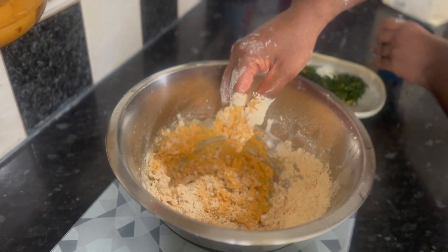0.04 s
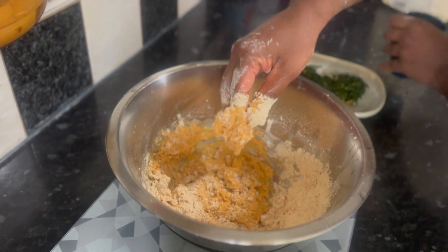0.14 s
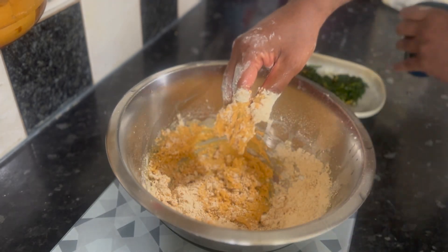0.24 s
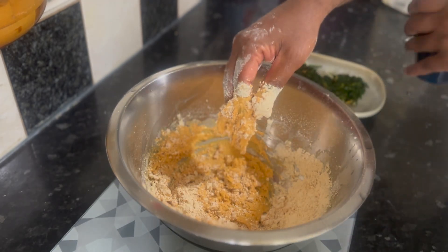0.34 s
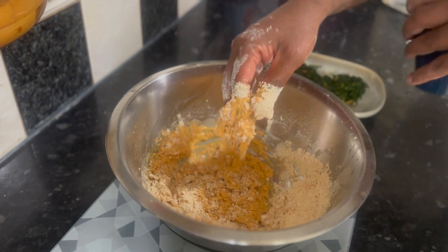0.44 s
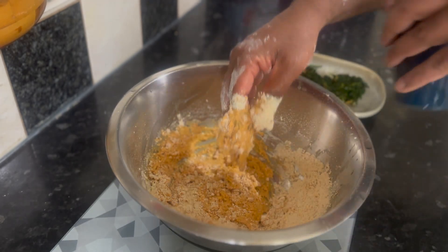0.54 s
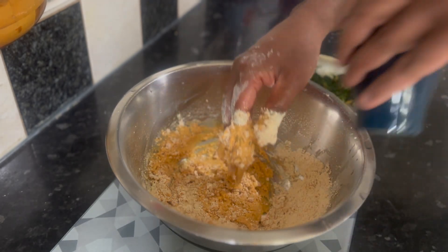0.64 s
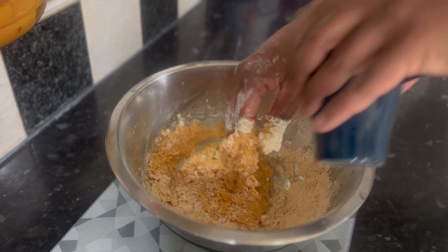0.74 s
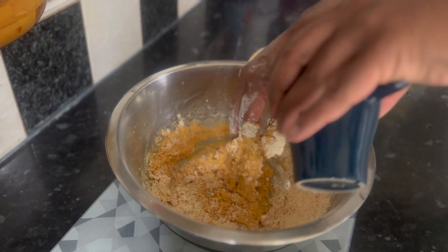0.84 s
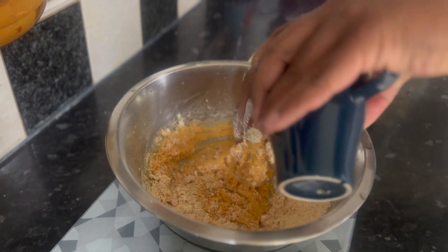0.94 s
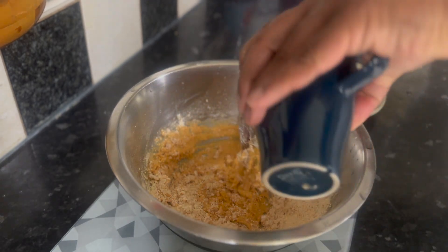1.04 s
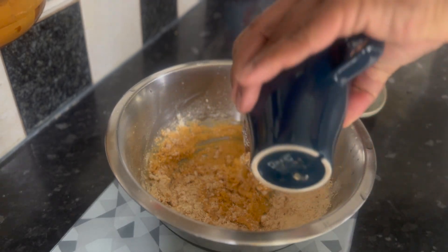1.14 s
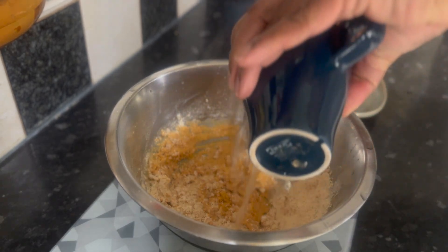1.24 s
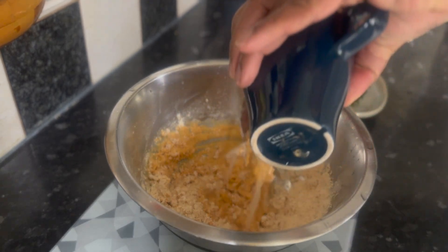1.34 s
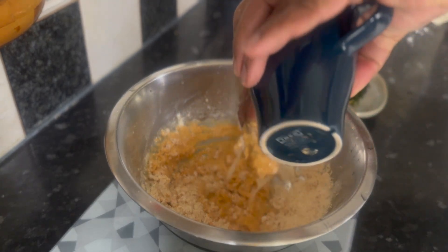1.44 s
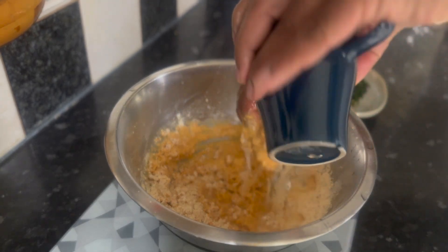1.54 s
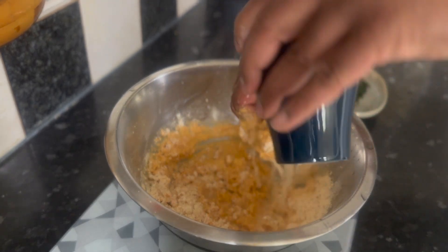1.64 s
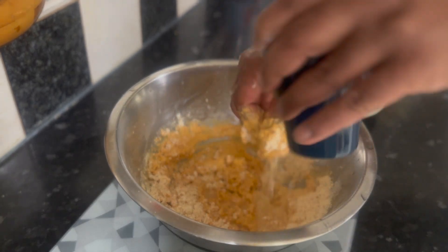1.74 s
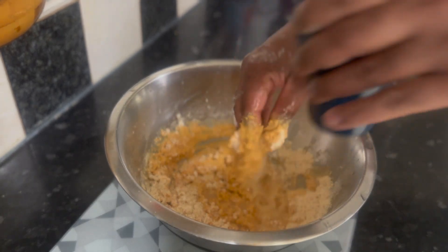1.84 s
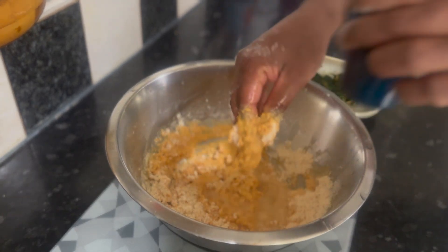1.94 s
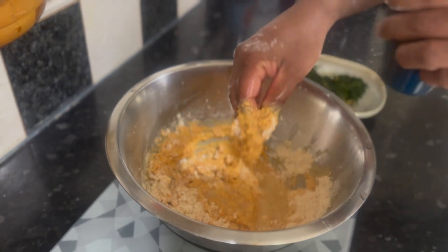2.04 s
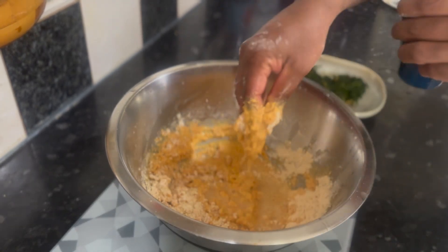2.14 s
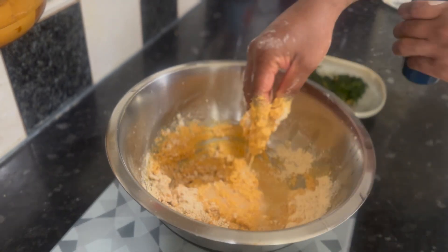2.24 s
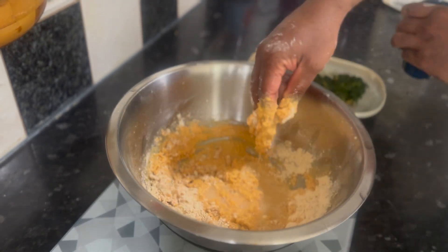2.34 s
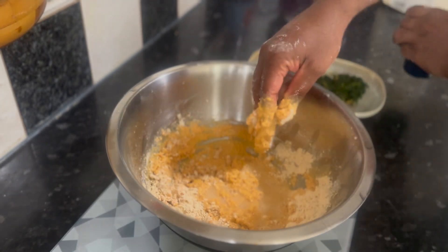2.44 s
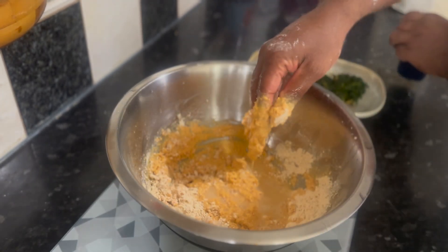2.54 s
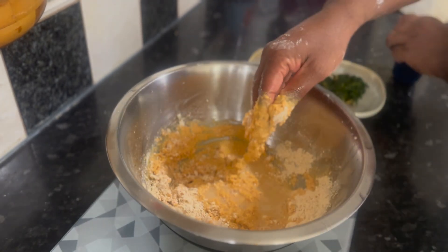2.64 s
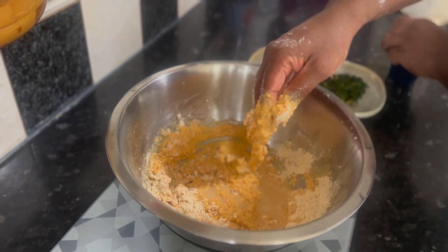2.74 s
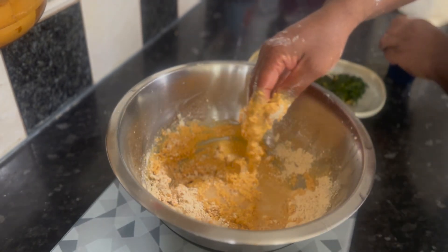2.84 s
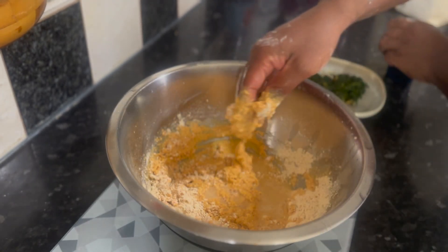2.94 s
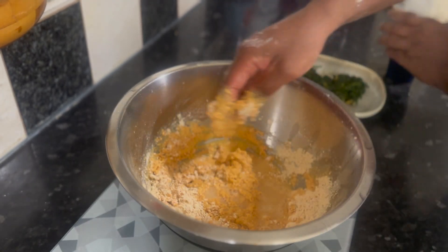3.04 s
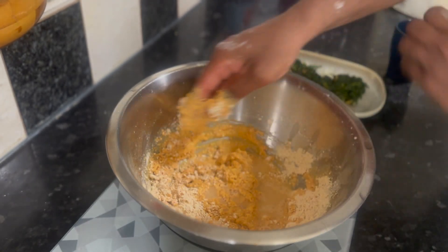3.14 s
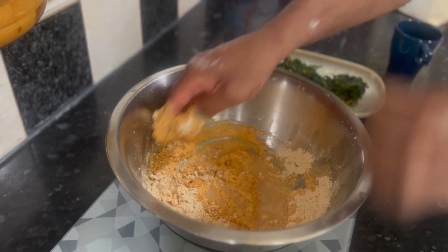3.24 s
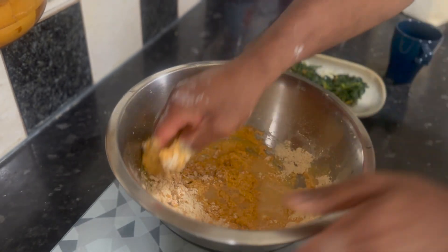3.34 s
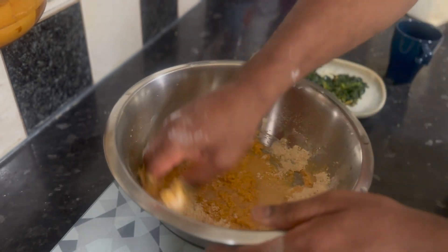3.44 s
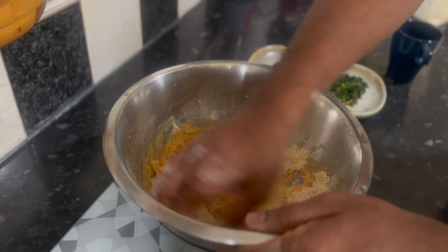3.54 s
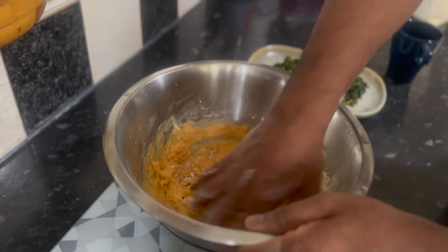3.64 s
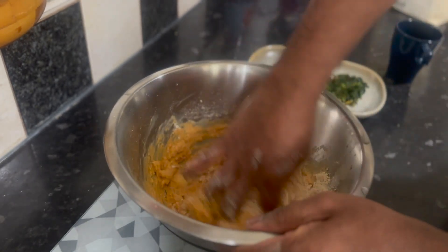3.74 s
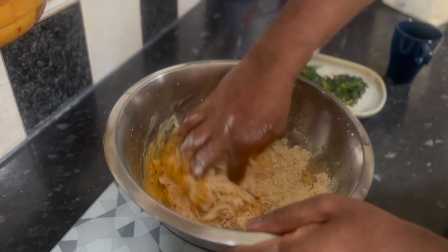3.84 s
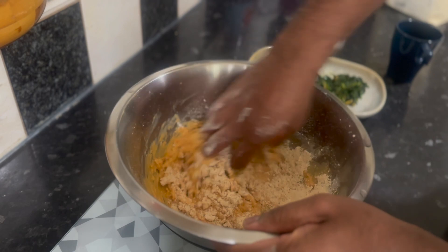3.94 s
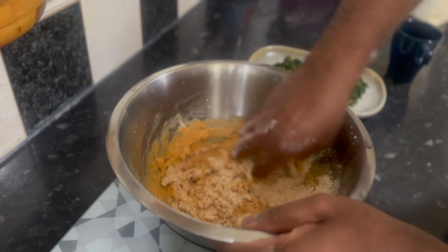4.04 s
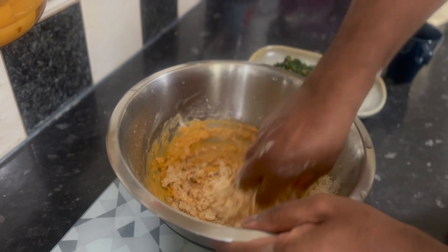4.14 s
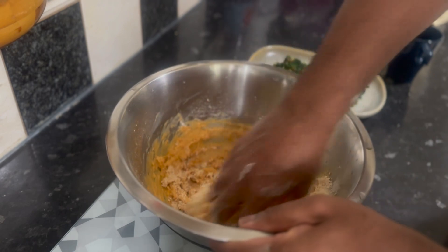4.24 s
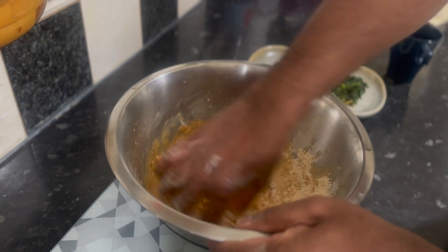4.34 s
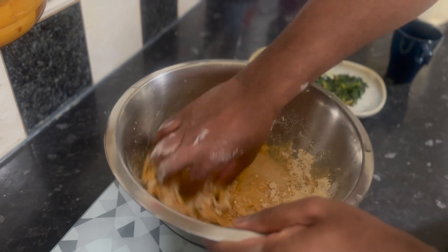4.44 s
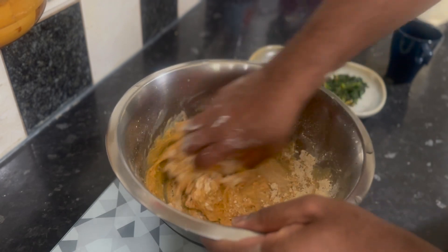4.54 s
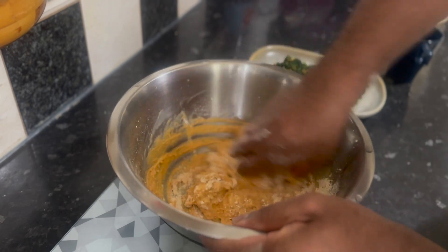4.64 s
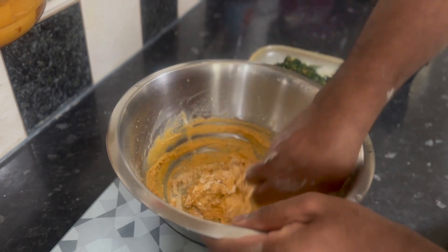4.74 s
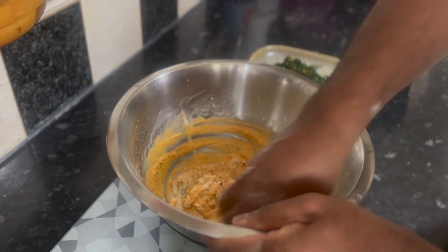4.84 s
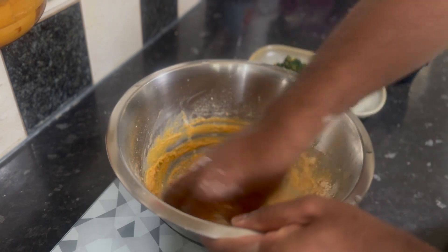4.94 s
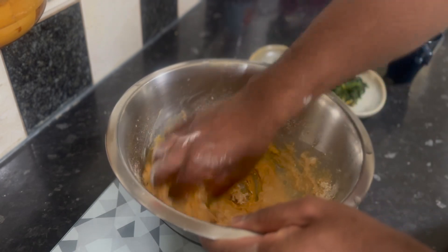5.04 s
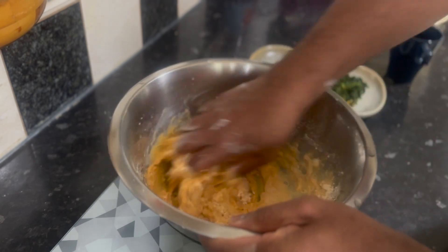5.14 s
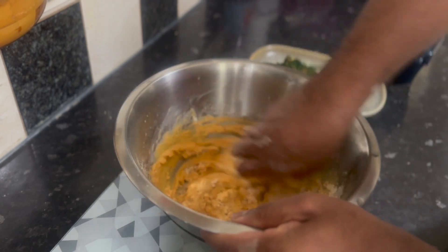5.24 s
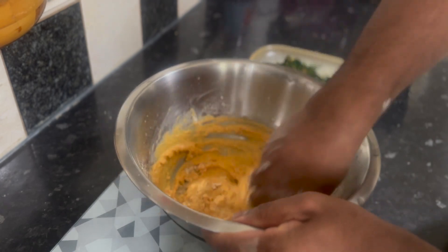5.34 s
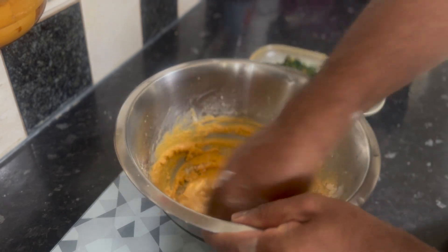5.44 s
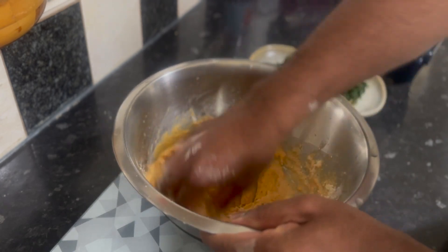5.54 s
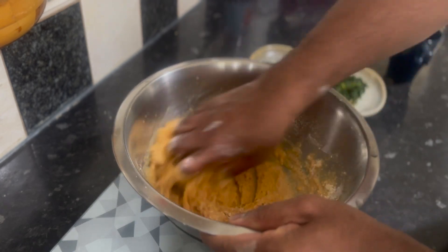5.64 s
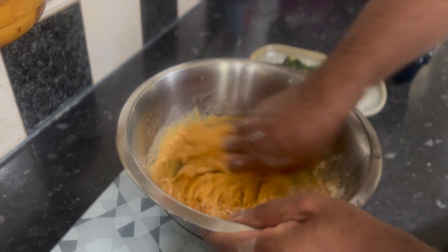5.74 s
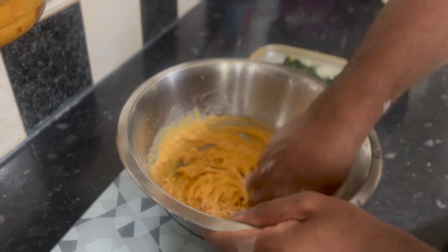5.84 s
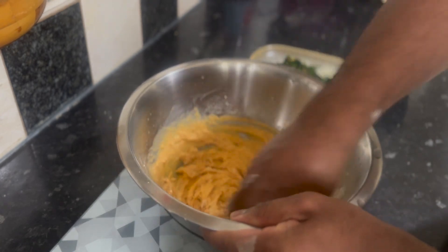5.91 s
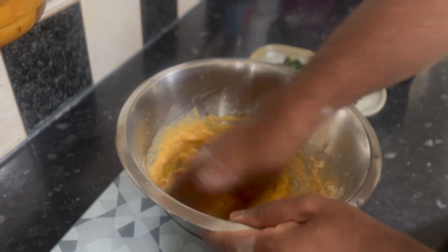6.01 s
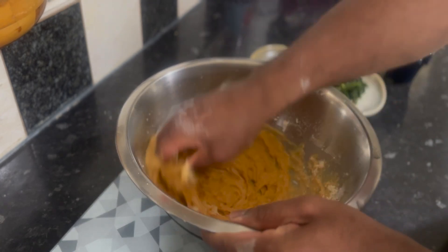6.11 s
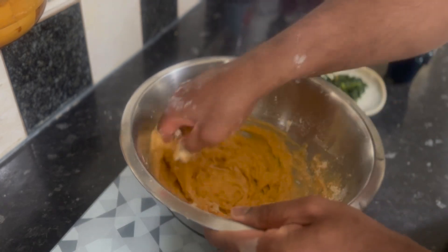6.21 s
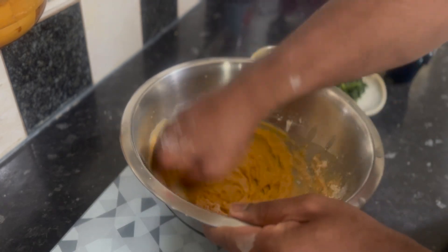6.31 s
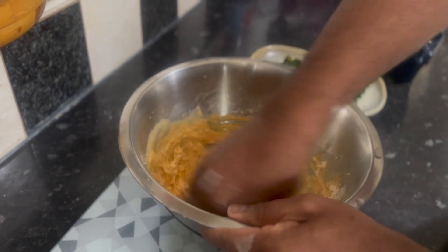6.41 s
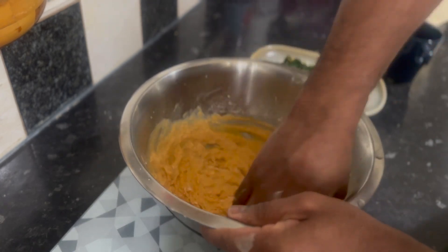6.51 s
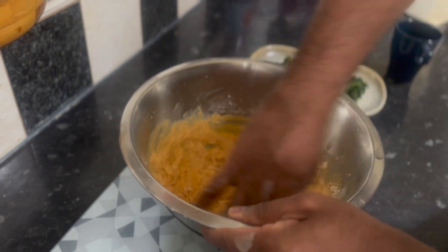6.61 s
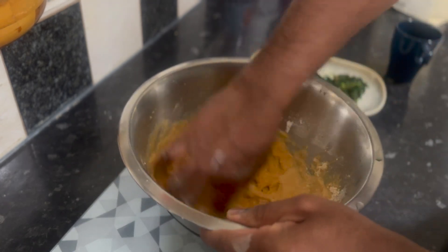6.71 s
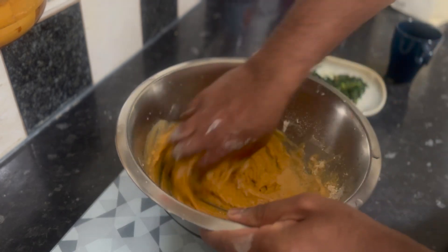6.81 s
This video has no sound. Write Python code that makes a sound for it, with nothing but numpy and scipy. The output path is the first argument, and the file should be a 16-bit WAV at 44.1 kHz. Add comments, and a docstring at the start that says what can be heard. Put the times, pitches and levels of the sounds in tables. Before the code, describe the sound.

A short pour and one loud mug knock on stone, followed by soft, wet squishing and popping of batter mixed by hand.

```python
"""A hand kneads wet batter in a steel bowl: it drags, squelches and fizzes, air pockets plop, wet films snap.
Before the main kneading, a mug clinks lightly and its water patters, bubbles and splashes onto flour; it
is set down hard and rocks, ringing the stone counter. Dull bumps come through the counter. Behind it
all: the kitchen's low rumble, a faint hiss and a thin tick about thirty times a second."""
import sys
import numpy as np
from scipy import signal
from scipy.fft import rfft, irfft, next_fast_len
from scipy.io import wavfile
from scipy.ndimage import uniform_filter1d, map_coordinates

SR = 44100
rng = np.random.default_rng(int(sys.argv[2]) if len(sys.argv) > 2 else 0)


def unload_wav(signal):
    """Save mono or channel-first audio to the path in sys.argv[1] as 16-bit WAV at rate SR, clipped to [-1, 1]."""
    wavfile.write(
        sys.argv[1],
        SR,
        np.round(np.clip(np.atleast_2d(signal).T, -1, 1) * 32767).astype(np.int16),
    )


N = 302973

# dull spectrum of dough drag and water patter: freq_hz, gain_db
DULL_SPECTRUM = [(80, -44.5), (140, -5.5), (220, -3), (330, 3), (480, 0.5), (600, -0.5), (720, -16.5),
                 (1200, -26.5)]
# wet spectrum of squelch and stream: freq_hz, gain_db
WET_SPECTRUM = [(400, -10.5), (750, -5), (1050, -1.5), (1500, -4), (2200, -5), (2800, -6.5), (3300, -10),
                (4500, -12.5), (8000, -25)]


def amp(db):
    """dB to gain."""
    return 10 ** (np.asarray(db) / 20)


def unit(x):
    """Scale to rms 1."""
    return x / np.sqrt(np.mean(x ** 2) + 1e-20)


def along(points, hz):
    """Interpolate (freq_hz, value) points on a log axis."""
    freq_hz, values = np.transpose(points)
    return np.interp(np.log(hz + 1), np.log(freq_hz + 1), values)


def gains(rows):
    """Smoothed gain curve per dB column; silent outside the table."""
    time_s, *columns_db = np.transpose(rows)
    curves = amp([np.interp(np.arange(N) / SR, time_s, db, left=-200, right=-200) for db in columns_db])
    return uniform_filter1d(curves, size=900, axis=1, mode="nearest")


def swell(rows, sag_db=2, release_t60_s=0.39):
    """Gain curve per dB column: each gesture rises, sags and dies away; powers add."""
    t, power = np.arange(N) / SR, 0
    for start_s, rise_s, length_s, *levels_db in rows:
        age_s = t - start_s
        attack = np.sin(np.pi / 2 * np.clip(age_s / max(rise_s, .002), 0, 1)) ** 2
        sag = amp(-sag_db * np.clip(age_s / length_s, 0, 1))
        release = amp(-60 * np.clip(age_s - length_s, 0, 1) / release_t60_s)
        power = power + (amp(levels_db)[:, None] * attack * sag * release) ** 2
    return np.sqrt(power)


def wobble(knots_per_s):
    """Smooth random curve."""
    knots = rng.standard_normal(int(N * knots_per_s / SR) + 4)
    return map_coordinates(knots, [np.arange(N) * knots_per_s / SR])


def filtered(x, response):
    """Apply response(hz) by FFT."""
    n = x.shape[-1]
    n_fft = next_fast_len(n + 4096)
    return irfft(rfft(x, n_fft) * response(np.fft.rfftfreq(n_fft, 1 / SR)), n_fft)[..., :n]


def coloured(x, spectrum):
    """Shape by (freq_hz, gain_db) points; rms 1."""
    return unit(filtered(x, lambda hz: amp(along(spectrum, hz))))


def add(track, start_s, sound):
    """Mix in at start_s."""
    part = track[:, round(start_s * SR):][:, :sound.shape[1]]
    part += sound[:, :part.shape[1]]


def rush(spectrum, patchy_db=0, grains_per_s=0, spread_db=0, crackle_share=0, size=N):
    """Noise pair, rms 1: random time-frequency patches plus crackle grains of scattered size."""
    bins = signal.stft(rng.standard_normal((2, size)), nperseg=256)[2]
    patches = uniform_filter1d(rng.standard_normal(bins.shape[1:]), size=8, axis=0)
    patches = uniform_filter1d(patches, size=6, axis=1)
    noise = signal.istft(bins * amp(patchy_db * unit(patches)), nperseg=256)[1][:, :size]
    onsets = rng.random(size) < grains_per_s / SR
    strength = amp(spread_db * np.minimum(rng.exponential(size=size), 3.5))
    grains = signal.lfilter([1], [1, -np.exp(-1 / (0.0029 * SR))], onsets * strength)
    crackle = grains * rng.standard_normal((2, size))
    mix = np.sqrt(1 - crackle_share) * unit(noise) + np.sqrt(crackle_share) * unit(crackle)
    return coloured(mix, spectrum)


def ring(modes, t, hardness_hz, scatter_db):
    """Damped modes; soft blows excite high ones less, low ones build more slowly."""
    hz, db, t60_s = np.transpose(modes)[:, :, None]
    level = amp(db + scatter_db * rng.standard_normal((2,) + hz.shape)) / (1 + (hz / hardness_hz) ** 3.2)
    phase = rng.uniform(0, 2 * np.pi, (2,) + hz.shape) * [[[0]], [[1]]]
    envelope = amp(-60 * t / t60_s) * (1 - np.exp(-t * hz / 0.96))
    return np.sum(level * envelope * np.sin(2 * np.pi * hz * t + phase), axis=1)


def knead():
    """Dough drags on steel, squelches between fingers, fizzes as it tears; rubbed steel sings faintly."""
    # hand strokes: start_s, rise_s, length_s, drag_db, squelch_db, fizz_db
    strokes = [(0.05, 0.24, 0.5, -73.5, -66, -66.5), (0.5, 0.069, 0.38, -83.5, -77, -78),
               (2.1, 0.24, 0.44, -77, -71, -68.5), (2.95, 0.13, 0.35, -71, -63, -66),
               (3.2, 0.19, 0.37, -66.5, -60.5, -61), (3.57, 0.0036, .15, -65, -56.5, -59.5),
               (3.72, 0.071, 0.25, -69, -58.5, -61.5), (4.0, 0.031, .15, -76, -69.5, -66),
               (4.13, 0.046, 0.38, -74.5, -62.5, -64.5), (4.47, 0.076, 0.18, -60, -57.5, -55),
               (4.68, 0.082, 0.3, -67.5, -61, -65.5), (4.96, .03, 0.28, -61, -57.5, -58.5),
               (5.3, 0.1, 0.24, -80, -60.5, -63), (5.54, 0.015, 0.028, -61, -52, -49),
               (5.6, 0.046, 0.46, -62.5, -59.5, -59.5), (6.08, 0.014, 0.24, -61.5, -78, -69),
               (6.3, 0.06, 0.073, -67, -56, -63), (6.39, 0.0057, 0.092, -63, -53.5, -53.5),
               (6.55, 0.12, 0.24, -75.5, -60, -58.5), (6.74, 0.1, 0.17, -55, -52, -52)]
    # fingers sliding on steel: start_s, rise_s, length_s, level_db
    rubs = [(4.72, .3, .5, -66)]
    # rubbed steel: freq_hz, gain_db
    rub_spectrum = [(2250, -38), (2600, -8), (2800, 3), (3000, -7), (3400, -40)]
    # tearing batter: freq_hz, gain_db
    fizz_spectrum = [(1470, -43), (2500, -10), (2810, -1), (5760, -0.5), (6230, -1), (7350, -2.5),
                     (8600, -7), (10100, 0), (15000, -11), (16400, -6)]
    drag_gain, squelch_gain, fizz_gain = swell(strokes)
    surge = amp(1.3 * wobble(40))
    drag = drag_gain * rush(DULL_SPECTRUM, patchy_db=2.5)
    rub = swell(rubs) * rush(rub_spectrum, patchy_db=2.5)
    squelch = rush(WET_SPECTRUM, patchy_db=2.5, grains_per_s=140, spread_db=10.5, crackle_share=0.2)
    fizz = rush(fizz_spectrum, grains_per_s=520, spread_db=10, crackle_share=0.36)
    return drag + rub + surge * (squelch_gain * squelch + fizz_gain * fizz)


def pops(rows, t60_s, tone_gain, crack_gain, smear_1khz_db, smear_db_per_oct, smear_t60_s):
    """Each pop: a short rising tone, a noise puff and a wide crack, then a fainter smear."""
    out, t = np.zeros((2, N)), np.arange(SR // 5) / SR
    attack = 1 - np.exp(-t / (0.041 * t60_s))
    for time_s, db, hz, width_oct in rows:
        band = lambda f, octaves: np.exp(-.5 * (np.log2((f + 1) / hz) / max(octaves, .05)) ** 2)
        noise = rng.standard_normal((2, len(t)))
        puff = unit(filtered(noise, lambda f: band(f, width_oct)))
        crack = amp(-60 * t / 0.0042) * unit(filtered(noise, lambda f: band(f, 3 * width_oct)))
        tone = np.sin(2 * np.pi * hz * t * (1 + 4 * t) + [[0], [rng.uniform(0, 2 * np.pi)]])
        burst = attack * (amp(-60 * t / t60_s) * (tone_gain * tone + .5 * puff) + crack_gain * crack)
        burst /= np.abs(burst).max(axis=1, keepdims=True)
        smear_db = smear_1khz_db + smear_db_per_oct * np.log2(hz / 1000)
        smear = attack * amp(smear_db - 60 * t / smear_t60_s) * puff
        add(out, time_s - .001, amp(db) * (burst + smear))
    return out


def plops_and_contacts():
    """Lower, longer pops: plopping air pockets and drops, plus a mug clink and a short knock."""
    # plops and contacts: time_s, level_db, pitch_hz, width_oct
    # 0.845, 0.846 s: light mug clink near 2.3 and 5.5 kHz; 6.265 s: knock that starts a dull bump
    events = [(0.845, -58, 2330, 0.23), (0.846, -59, 5470, .15), (1.275, -52, 4070, 0.19),
              (1.354, -46, 4060, 0.34), (1.562, -42.5, 2730, 0.43), (1.64, -42, 2220, 0.67),
              (1.696, -38, 2690, 0.7), (1.714, -62, 2880, .33), (1.734, -42, 2590, 0.24),
              (1.962, -46, 1500, 1), (2.358, -52.5, 3030, .4), (3.38, -35.5, 745, 1), (3.577, -35, 4020, 1),
              (3.619, -32, 658, 0.61), (3.639, -54, 880, .38), (3.81, -51, 940, 0.16),
              (3.844, -41.5, 940, 0.49), (3.88, -40, 940, 0.62), (3.918, -35.5, 1390, 0.49),
              (3.942, -42, 2510, .19), (3.982, -48.5, 2300, 0.38), (4.165, -48.5, 1025, 1),
              (4.239, -46.5, 1390, .72), (4.387, -47.5, 3760, 0.44), (4.478, -50.5, 935, .25),
              (4.508, -48.5, 876, 0.25), (4.543, -35, 965, 0.69), (4.555, -40, 760, 0.35),
              (4.573, -55, 1030, 0.26), (4.643, -39, 1028, 0.11), (4.651, -39.5, 1010, 0.72),
              (4.977, -47.5, 2570, .37), (5.035, -38.5, 4010, .39), (5.075, -45, 1510, 0.78),
              (5.216, -37, 780, 1), (5.402, -47.5, 3450, .38), (5.525, -50.5, 891, .7),
              (5.56, -45, 990, 0.78), (5.572, -42, 298, .6), (5.67, -42.5, 1250, 1),
              (5.701, -47.5, 1485, 0.27), (5.862, -55, 1110, 0.58), (5.93, -47.5, 2520, .8),
              (6.265, -39, 590, 0.37), (6.404, -49, 1020, .33), (6.43, -42.5, 1960, 0.32),
              (6.449, -42.5, 3180, .83), (6.489, -50, 1120, .3), (6.654, -45.5, 1180, 1),
              (6.725, -50, 828, .3), (6.809, -42.5, 2930, 0.23), (6.834, -41, 890, 0.19),
              (6.854, -50, 1080, .34)]
    return pops(events, t60_s=0.024, tone_gain=1, crack_gain=0.9,
                smear_1khz_db=-19, smear_db_per_oct=3.5, smear_t60_s=0.27)


def snaps():
    """Wet films and droplets: higher, shorter pops."""
    # snaps: time_s, level_db, pitch_hz, width_oct
    films = [(0.841, -52.5, 5270, 0.67), (1.253, -44, 6400, 0.58), (1.327, -46, 12200, .5),
             (1.404, -43, 10900, .58), (1.5007, -29.5, 10230, 0.96), (1.5144, -34, 5420, 0.34),
             (1.589, -49, 10700, .5), (1.621, -39.5, 11200, 0.35), (1.687, -49, 4600, 0.66),
             (1.695, -42.5, 7700, .37), (1.793, -36.5, 10700, 0.31), (1.802, -44, 4310, .75),
             (1.841, -41, 6560, .5), (1.866, -46, 11400, .5), (1.891, -42.5, 11300, .5),
             (1.9616, -41.5, 10600, 1), (2.3584, -43, 13800, 0.56), (3.246, -45, 13100, .5),
             (3.2904, -42.5, 12800, 1), (3.3827, -32, 5700, 0.22), (3.5784, -34, 5400, 0.17),
             (3.781, -49, 5300, .42), (3.892, -49, 13500, .4), (3.939, -47.5, 4320, .9),
             (3.981, -45, 5170, 1), (4.441, -46, 9750, .5), (4.5096, -36, 13500, 0.58),
             (4.544, -42.5, 9400, .88), (4.5875, -42, 11100, .9), (4.61, -39.5, 10100, 1),
             (4.6437, -43, 5260, 0.24), (5.0225, -49, 4620, .9), (5.1484, -36, 13200, 0.67),
             (5.1873, -32, 6150, 0.69), (5.195, -46, 6430, .4), (5.276, -52, 13700, .5),
             (5.438, -46, 6300, 1), (5.558, -39, 11340, 1), (5.9155, -46, 4300, 0.46),
             (6.378, -50, 6000, .9), (6.4038, -40.5, 3980, 1), (6.613, -45, 13200, .55),
             (6.657, -48, 5960, 0.59), (6.723, -49, 6940, .5), (6.799, -31.5, 11850, 0.36),
             (6.825, -41, 4730, 0.45)]
    return pops(films, t60_s=0.011, tone_gain=0.93, crack_gain=0.79,
                smear_1khz_db=-1, smear_db_per_oct=-5.5, smear_t60_s=0.26)


def pour(patter_db=-20):
    """Water lands on flour: dull patter, bubbling, fine spray."""
    # stream strength: time_s, bubbling_db, splash_db
    stream = [(1.235, -74, -72), (1.3, -59.5, -56), (1.43, -64, -60), (1.5, -62, -55), (1.59, -73, -52),
              (1.7, -58, -61), (1.79, -63.5, -56.5), (1.9, -68, -56.5), (1.95, -78, -70)]
    # first water thudding into dry flour: start_s, rise_s, length_s, level_db
    first_water = [(1.28, .02, .06, -67)]
    # fine drops: freq_hz, gain_db
    spray_spectrum = [(1470, -25.5), (2500, -7.5), (2810, -9), (3620, -11), (5490, -7.5), (9310, -13.5),
                      (10900, -10.5), (15000, -20), (16000, -22), (16400, -34)]
    out, start = np.zeros((2, N)), round(stream[0][0] * SR)
    span = slice(start, start + SR)
    bubbling_gain, splash_gain = gains(stream)[:, span]
    patter_gain = swell(first_water)[:, span] + amp(patter_db) * bubbling_gain
    chirps = bubbles()
    wash = rush(WET_SPECTRUM, patchy_db=7, grains_per_s=580, spread_db=-4, crackle_share=0.39, size=SR)
    spray = rush(spray_spectrum, patchy_db=5.5, grains_per_s=340, spread_db=-7,
                 crackle_share=0.43, size=SR)
    patter = rush(DULL_SPECTRUM, patchy_db=-1, size=SR)
    out[:, span] = patter_gain * patter + bubbling_gain * (0.28 * chirps + 0.79 * wash) + splash_gain * spray
    return out


def bubbles(count=500, lowest_hz=1300, life_cycles=14):
    """One second of short bubbles, each a damped rising tone; rms 1."""
    when, pitch, softness, channel = rng.random((count, 4)).T[:, :, None]
    t = np.arange(round(.03 * SR)) / SR
    hz = lowest_hz * 2.4 ** pitch
    age = t * hz / life_cycles
    envelope = amp(-18 * softness) * age * np.exp(-3 * age)
    chirps = envelope * np.sin(2 * np.pi * hz * t * (1 + 0.058 * age))
    index = (when * (SR - len(t))).astype(int) + np.arange(len(t)) + SR * (channel > .5)
    return unit(np.bincount(index.ravel(), chirps.ravel(), 2 * SR).reshape(2, SR))


def gurgle(start_hz=1200, climb_hz_per_s=1100, wander_share=0.0255):
    """Unsteady air pocket in the mug's mouth: a climbing, throbbing tone."""
    # air pocket: start_s, rise_s, length_s, level_db
    pocket = [(1.37, .015, .09, -60)]
    age_s = np.arange(N) / SR - pocket[0][0]
    hz = (start_hz + climb_hz_per_s * age_s) * (1 + wander_share * wobble(40))
    cycles = np.cumsum(hz) / SR + 0.31 * wobble(150)
    throb = amp(3 + 3.7 * wobble(69.2))
    return swell(pocket) * throb * np.sin(2 * np.pi * cycles + [[0], [np.pi / 2]])


def mug_knocks():
    """The mug touches, lands and rocks; each blow rings the counter and the room."""
    # mug contacts: time_s, level_db, low_cut_hz, hardness_hz, rise_s
    blows = [(2.488, -45.5, 500, 1910, 0.00097), (2.695, -7.5, 47.9, 1500, 0.00098),
             (2.84, -23, 195, 676, 0.0026), (2.95, -36.5, 150, 484, 0.006), (3.06, -43, 160, 217.6, 0.013),
             (3.116, -44.5, 160, 220, 0.011), (3.168, -47.5, 161, 220, 0.012),
             (3.242, -48, 159, 230, 0.015)]
    # stone counter modes: freq_hz, level_db, t60_s
    counter_modes = [(53.44, -12, 0.36), (89, -3.5, 0.28), (140.5, -3.5, 0.33), (171.3, -7.5, 0.48),
                     (208, -7, 0.2), (229.5, -10, 0.13), (291.2, 1.5, 0.16), (320.5, -13.5, 0.37),
                     (422, -8, 0.26), (472, -1.5, 0.15), (579, -12, 0.35), (601, -4, 0.17), (706, -4, 0.2),
                     (695, -8, 0.1), (917, 5, 0.1), (974, -4.5, 0.27), (1050, -1.5, 0.22),
                     (1134, -4.5, 0.15), (1434, -4, 0.27), (1490, 3, 0.083), (2220, -6, 0.18),
                     (2150, -3.5, 0.099)]
    out, t = np.zeros((2, N)), np.arange(SR * 2 // 5) / SR
    for time_s, db, low_cut_hz, hardness_hz, rise_s in blows:
        room = filtered(room_tail(len(t)),
                        lambda f: 1j * f / (400 + 1j * f) / (1 + 1j * f / hardness_hz) ** 2.33)
        room *= 1 + 2 * amp(-60 * t / 0.032)  # strike stands above the tail
        counter = ring(counter_modes, t, hardness_hz, scatter_db=3.5)
        knock = (amp(4.5) * unit(counter) + unit(room)) * (1 - np.exp(-t / rise_s))
        # light contacts do not move the counter's mass
        knock = filtered(knock, lambda f: (1j * f / (low_cut_hz + 1j * f)) ** 2)
        add(out, time_s, amp(db) * knock / (4 * knock[0, :SR // 25].std()))
    return out


def bowl_grip():
    """A hand closes on the rim and rings the bowl."""
    # grips: time_s, level_db
    grips = [(3.379, -26.5)]
    # steel bowl modes: freq_hz, level_db, t60_s
    bowl_modes = [(283, 3, 0.22), (732, 5.5, 0.23), (1780, -7, 0.42), (2083, -15, 0.66), (2460, -13, 0.5)]
    out, t = np.zeros((2, N)), np.arange(SR * 2 // 5) / SR
    for time_s, db in grips:
        add(out, time_s - .001, amp(db - 22.5) * ring(bowl_modes, t, hardness_hz=4500, scatter_db=3))
    return out


def thuds(room_db=-22, room_top_hz=680):
    """Soft bumps: higher bending waves arrive first, so the pitch drops into the low modes."""
    # bumps through the counter: time_s, level_db, hardness_hz
    bumps = [(4.577, -37.5, 71), (6.264, -25.5, 1000), (6.287, -26, 160)]
    # cabinet modes: freq_hz, level_db, t60_s
    cabinet_modes = [(53.3, -2.5, 0.28), (91, -6, 0.15), (143.4, 1.5, 0.18), (211, -15, 0.04),
                     (280, 0, 0.047)]
    out, t = np.zeros((2, N)), np.arange(SR * 3 // 5) / SR
    glide_hz = 120 + 240 * np.exp(-t / 0.0076)
    envelope = amp(-60 * t / 0.064) * (1 - np.exp(-t / 0.0052))
    glide = envelope * np.sin(2 * np.pi * np.cumsum(glide_hz) / SR)
    for time_s, db, hardness_hz in bumps:
        bending = 1.37 * glide / (1 + (200 / hardness_hz) ** 2)
        top_hz = min(hardness_hz, room_top_hz)
        room = filtered(room_tail(len(t)), lambda f: 1j * f / (250 + 1j * f) / (1 + 1j * f / top_hz) ** 2)
        room *= amp(room_db) * hardness_hz / 1000 / room[0, :SR // 25].std()
        cabinet = ring(cabinet_modes, t, hardness_hz, scatter_db=3.5)
        add(out, time_s, amp(db) * (bending + cabinet + room))
    return out


def room_tail(size):
    """Noise tail; each frequency decays at its own rate."""
    # kitchen reverberation: freq_hz, t60_s
    decay = [(100, 0.69), (260, 0.23), (700, 0.39), (1840, 0.27), (4850, 0.26)]
    hz, t, bins = signal.stft(rng.standard_normal((2, size)), SR, nperseg=256)
    tail = signal.istft(bins * amp(-60 * t / along(decay, hz)[:, None]), SR, nperseg=256)[1][:, :size]
    return tail * (1 - np.exp(-np.arange(size) / (0.00034 * SR)))


def room_tone(hiss_db=-66.5):
    """Drifting low rumble, steady faint hiss."""
    # rumble strength: time_s, level_db
    rumble_levels = [(0.0, -65.5), (0.4, -66), (0.82, -67.5), (1.05, -70.5), (1.3, -64.5), (2.1, -66),
                     (2.65, -62.5), (3.1, -62), (3.3, -61), (3.65, -61.5), (4.3, -63.5), (5.15, -60.5),
                     (5.5, -60.5), (6.0, -64), (6.4, -55), (6.66, -64), (6.87, -58)]
    # rumble: freq_hz, gain_db
    rumble_spectrum = [(13, -26), (22, -10), (59, 3.5), (174, -11), (231, -18), (263, -31.5), (300, -15.5),
                       (390, -64.5), (660, -120)]
    # hiss: freq_hz, gain_db
    hiss_spectrum = [(88, -34.5), (150, -11.5), (722, -11), (1030, -4.5), (1930, -9), (3910, -7.5),
                     (5250, -13), (6640, -15), (7770, -6.5), (8250, -13), (10900, -11), (14000, -13),
                     (15200, -20), (16400, -50.5)]
    rumble = coloured(rng.standard_normal((2, N)), rumble_spectrum)
    hiss = coloured(rng.standard_normal((2, N)), hiss_spectrum)
    return gains(rumble_levels) * rumble + amp(hiss_db) * hiss


def ticks(rate_hz=29.888, scatter_db=3.5):
    """Short narrow-band bursts: steady rate, uneven strength."""
    # tick trains: pitch_hz, first_s, width_s, left_db, right_db
    trains = [(7690, .008, 0.0042, -63, -104.5), (9000, .0005, 0.0033, -78, -67)]
    t, out = np.arange(N) / SR, 0
    for hz, first_s, width_s, left_db, right_db in trains:
        count = (t - first_s) * rate_hz + .5
        strength = amp(scatter_db * rng.standard_normal(N // 1000))[count.astype(int)]
        pulse = np.exp(-.5 * ((count % 1 - .5) / (rate_hz * width_s / 2)) ** 2)
        tone = np.sin(2 * np.pi * hz * t + 0.85 * wobble(66))
        out = out + amp([[left_db], [right_db]]) * strength * pulse * tone
    return out


def stereo(pair):
    """Two unrelated signals to left and right: alike in the bass and top treble, apart between."""
    # left-right likeness: freq_hz, correlation
    likeness = [(60, 0.89), (99, 1), (160, 0.88), (270, 0.67), (450, 0.25), (740, 0.2), (1220, 0.069),
                (2010, 0.24), (3330, -0.086), (5500, -0.14), (9080, 0.25), (15000, 0.89)]
    # balance: freq_hz, left_minus_right_db
    balance = [(60, -0.5), (110, 6.5), (200, 1), (380, -2), (700, 5), (1290, 1), (2380, 2.5), (4400, 5),
               (8120, 5.5), (15000, -3.5)]
    n_fft = next_fast_len(N + 4096)
    hz = np.fft.rfftfreq(n_fft, 1 / SR)
    angle = np.arccos(np.clip(along(likeness, hz), -1, 1)) / 2
    mid, side = rfft(pair, n_fft) * [np.cos(angle), np.sin(angle)]
    pan = amp(along(balance, hz) / 2 * [[1], [-1]])
    return irfft([mid + side, mid - side] * pan, n_fft)[:, :N]


def scene():
    """The kitchen in stereo, close to the bowl."""
    mix = plops_and_contacts() + snaps() + room_tone() + pour() + gurgle() + knead()
    mix += mug_knocks() + bowl_grip() + thuds()
    return stereo(mix) + ticks()


def record(dry):
    """Band limit: a 1 kHz wide roll-off centred on top_hz."""
    top_hz = 16100
    return filtered(dry, lambda hz: np.clip((top_hz + 500 - hz) / 1000, 0, 1) ** 2)


dry = scene()
out = record(dry)
unload_wav(out)
```